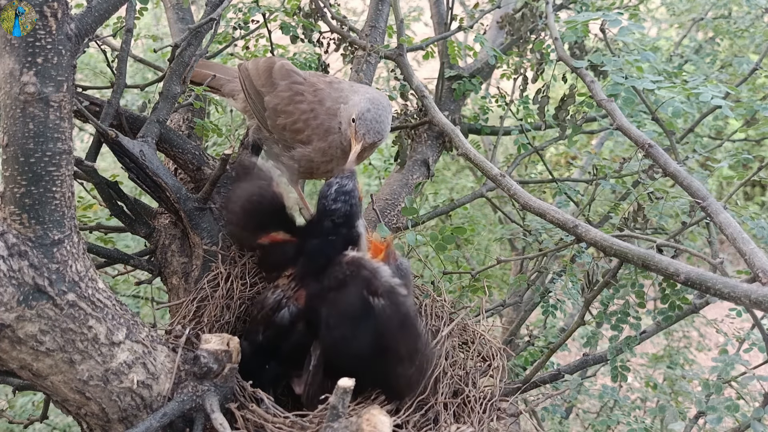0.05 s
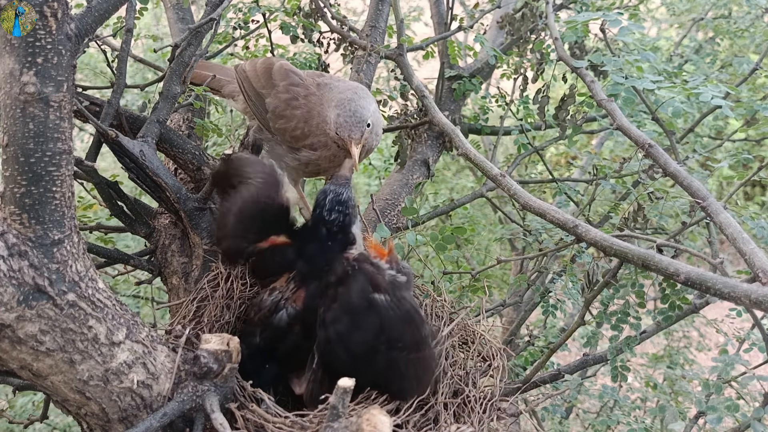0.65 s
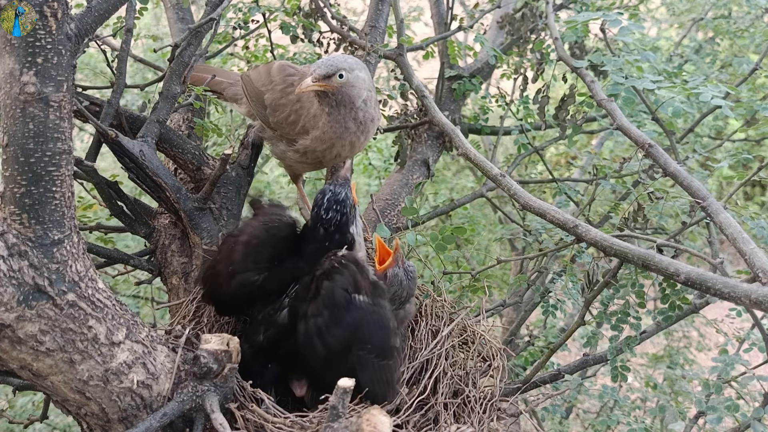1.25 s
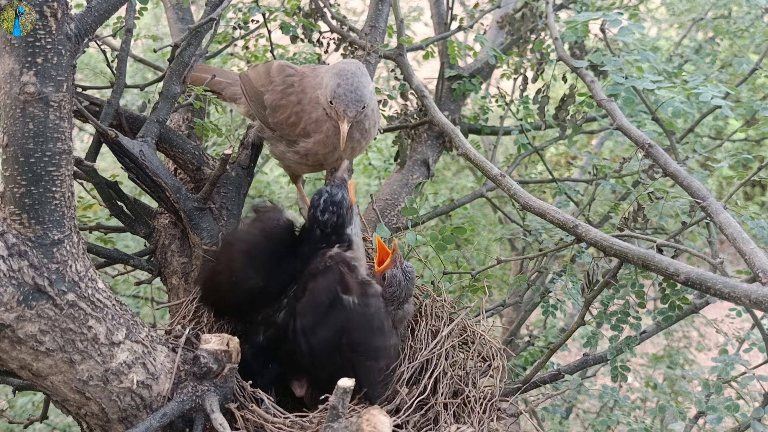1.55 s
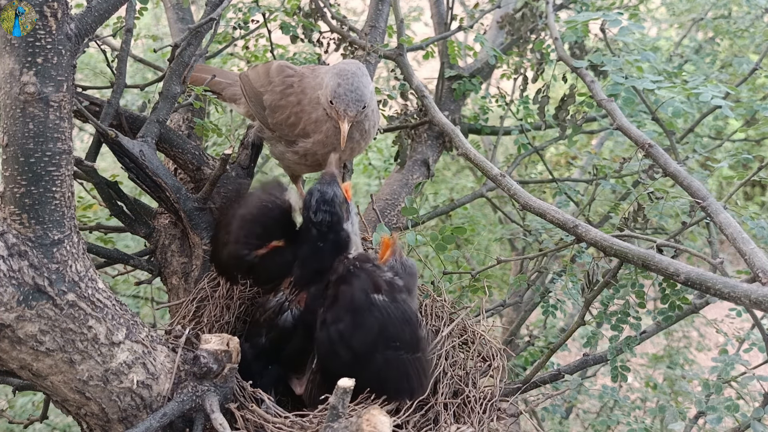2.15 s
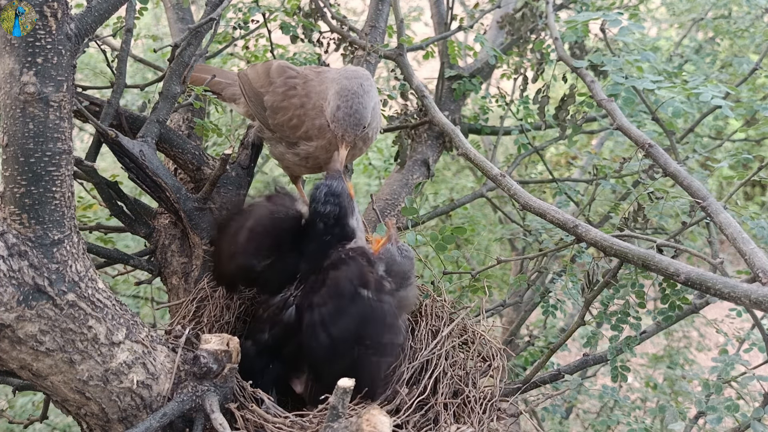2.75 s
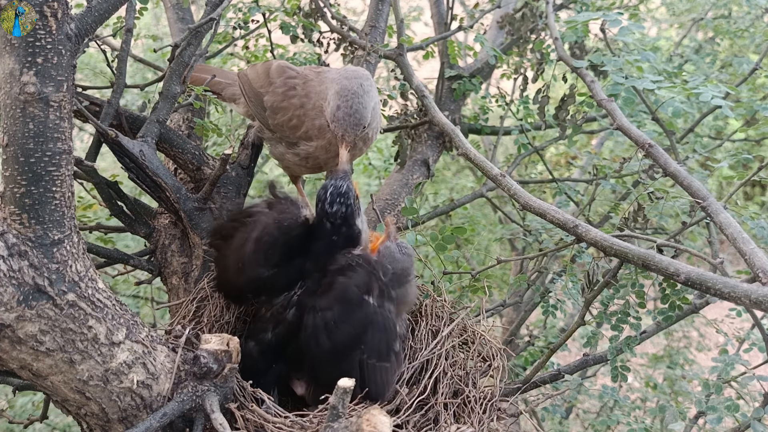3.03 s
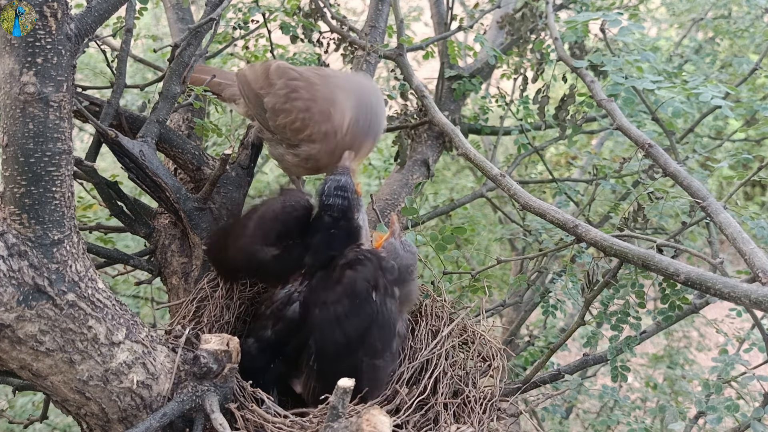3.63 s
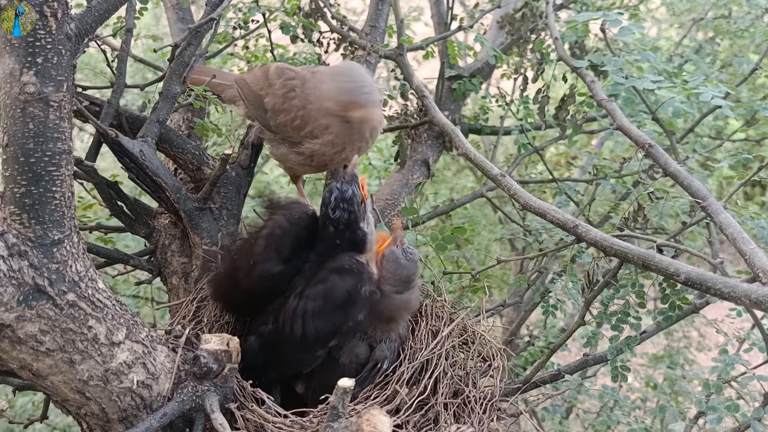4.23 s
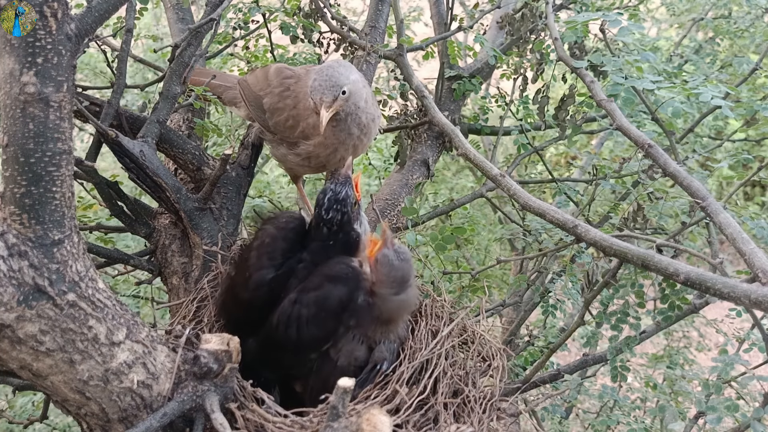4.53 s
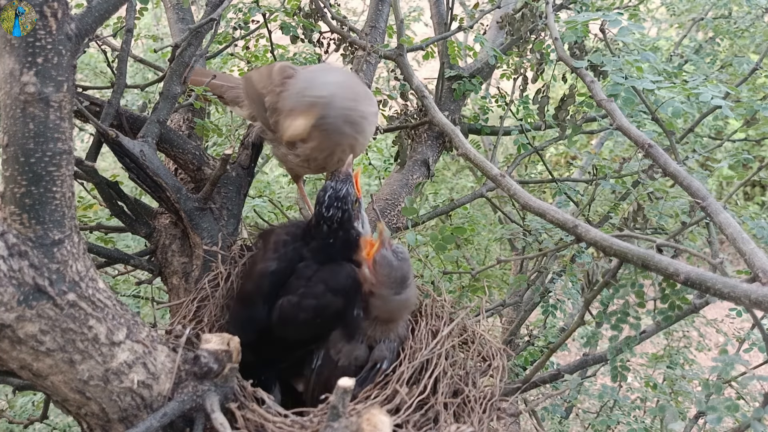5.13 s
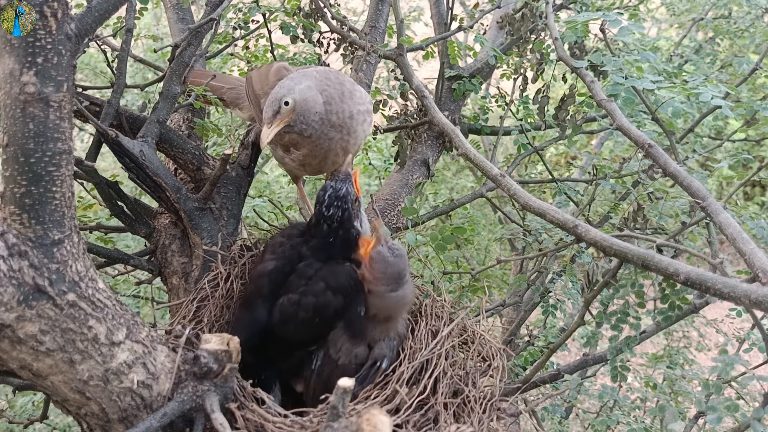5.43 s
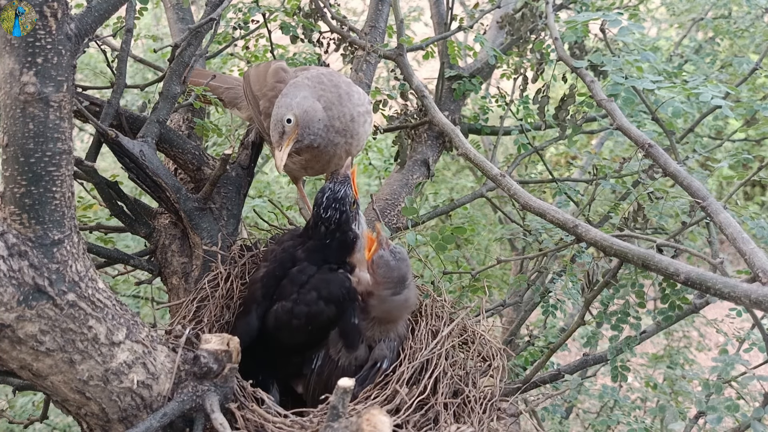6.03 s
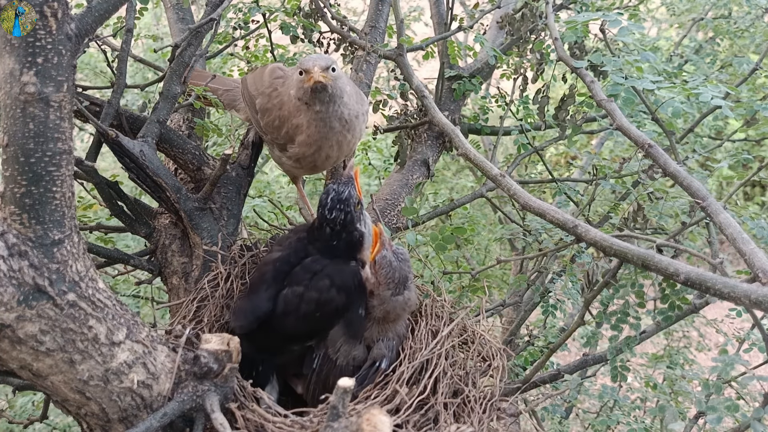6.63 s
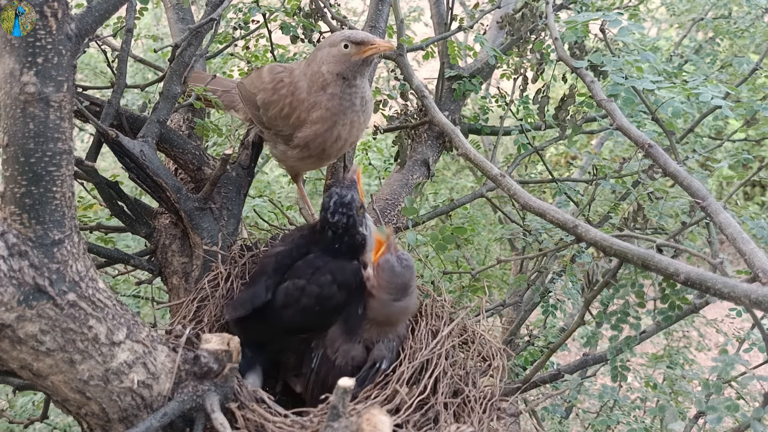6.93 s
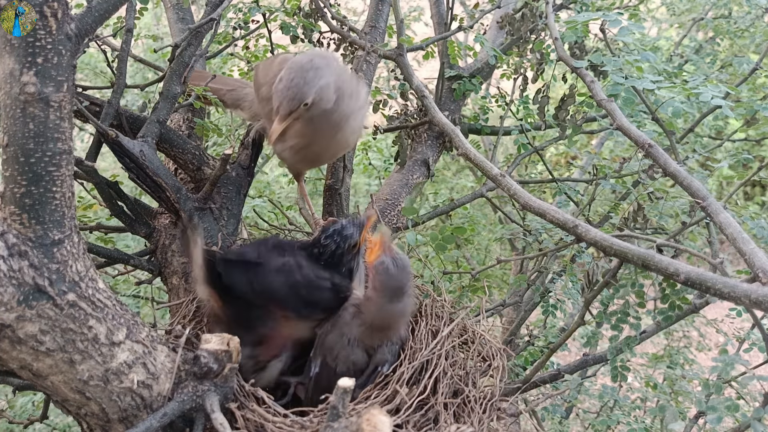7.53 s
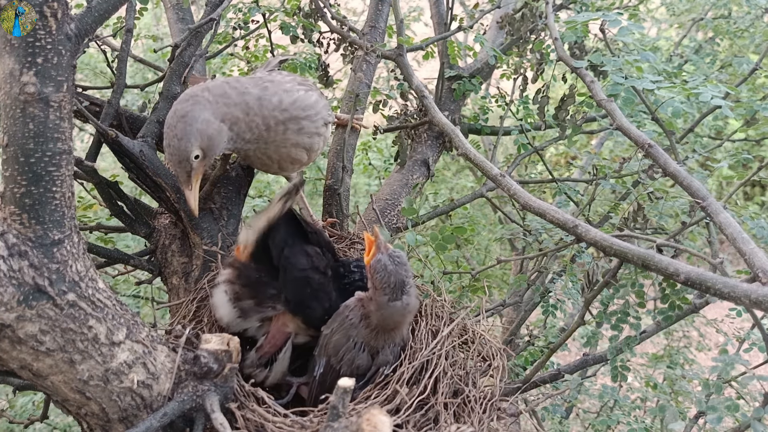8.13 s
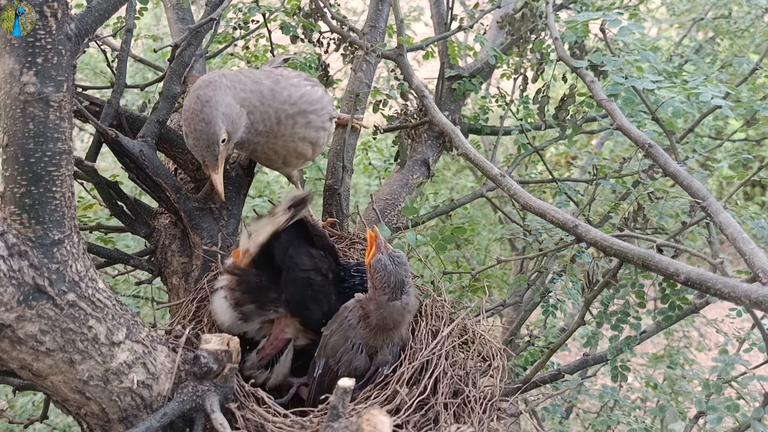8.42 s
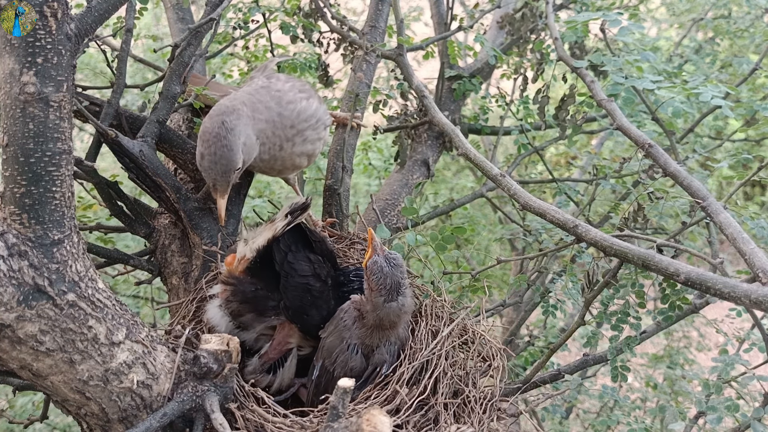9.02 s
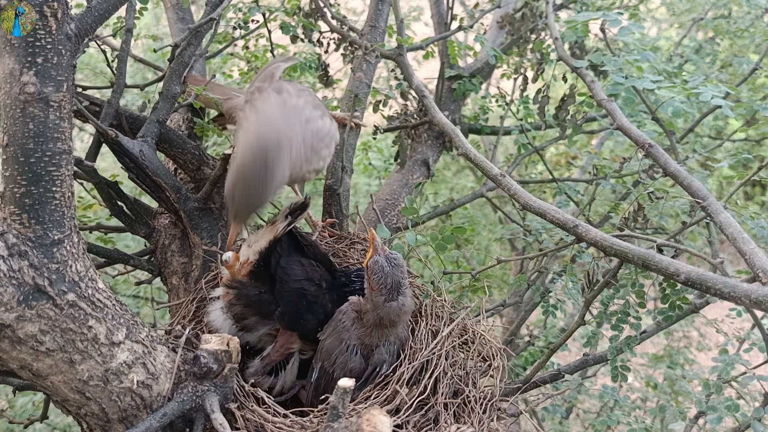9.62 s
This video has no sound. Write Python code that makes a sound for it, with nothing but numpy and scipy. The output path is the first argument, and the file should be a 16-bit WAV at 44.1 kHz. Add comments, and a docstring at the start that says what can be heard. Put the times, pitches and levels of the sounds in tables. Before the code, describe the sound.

Young birds beg in a tree nest, close to the microphone. One repeats shrill peeps that break into a rasp, with short chucks between, while its nest mates overlap with hoarse falling squawks and a few thin squeals. Near the end the squawks stop, leaving sparser peeps and chucks. Behind them are a faint insect hiss, an early small trill, distant whistles and a barely audible engine hum.

```python
"""Nestlings begging in a tree

One microphone close to a twig nest, where a parent stands over its young. One gives shrill arched
peeps that break into a rasp, with short chucks between; the others squeal and squawk in hoarse,
falling glides. Each voice is a membrane buzzing through throat and bill, echoed by the branches.
Further off insects hiss, a small bird trills, others whistle and an engine hums very faintly."""
import sys
import numpy as np
from scipy import signal
from scipy.fft import rfft, irfft
from scipy.io import wavfile

SR = 44100
rng = np.random.default_rng(int(sys.argv[2]) if len(sys.argv) > 2 else 0)


def digitize_waveform(pressure):
    """Quantize a signal to 16-bit integers and store it at the path in sys.argv[1].

    Rows of a 2-D input are taken as channels; values are limited to [-1, 1].
    """
    field = np.atleast_2d(pressure).T
    bounded = np.clip(field, -1, 1)
    quanta = np.round(bounded * 32767).astype(np.int16)
    wavfile.write(sys.argv[1], SR, quanta)


N = 430857
CUTOFF_HZ = 15700


def from_db(db):
    """Decibels to gain."""
    return 10 ** (np.asarray(db) / 20)


def unit_power(x):
    """Scale to unit power."""
    return x / np.sqrt(np.mean(x ** 2) + 1e-20)


def gain_at(spectrum, hz):
    """Gain of a spectrum at the given frequencies."""
    known_hz, db = np.transpose(spectrum)
    return from_db(np.interp(np.log(hz + 1e-3), np.log(known_hz), db))


def coloured(spectrum, size):
    """Noise with the given spectrum, unit power."""
    gains = gain_at(spectrum, np.fft.rfftfreq(size, 1 / SR))
    return unit_power(irfft(rfft(rng.standard_normal(size)) * gains, size))


def flutter(rate_hz, size):
    """Random wavering up to about the given rate, spread 1."""
    pole = np.exp(-2 * np.pi * rate_hz / SR)
    noise = rng.standard_normal(size + SR // 10)
    return unit_power(signal.lfilter([1], [1, -2 * pole, pole * pole], noise))[-size:]


def times(start, end):
    """Sample times of a span."""
    return np.arange(max(0, int(start * SR)), min(N, int(end * SR))) / SR


def fade(t, start, end, rise_s, fall_s):
    """Gate with sloping ends."""
    return np.clip((t - start) / rise_s, 0, 1) * np.clip((end - t) / fall_s, 0, 1)


def add(out, t, sound):
    """Mix a sound in at its times."""
    out[np.round(t * SR).astype(int)] += sound


def slide(age, top_hz, bottom_hz, half_s, power):
    """Pitch as the tension is let go: it lingers, falls, then levels out."""
    return bottom_hz + (top_hz - bottom_hz) / (1 + (np.maximum(age, 0) / half_s) ** power)


def drawn_out(t, pitch, level_db, waver=0.00497, release_s=0.035):
    """Gently wavering pitch and gain of one long call."""
    wavering = pitch * (1 + waver * flutter(31.1, len(t)))
    gain = from_db(level_db + flutter(43, len(t)) / 2)
    return wavering, gain * fade(t, t[0], t[-1], 0.003, release_s)


def gape(throat, treble_db, knee_hz=2400):
    """A wider bill lets out more of the octave above the knee and of all that lies beyond."""
    return [(hz, db + treble_db * np.clip(np.log2(hz / knee_hz), 0, 1)) for hz, db in throat]


def ring_phase(throat, hz, size=2048):
    """Phase of a throat that rings after each beat (minimum phase)."""
    grid = np.fft.rfftfreq(size, 1 / SR)
    cepstrum = irfft(np.log(gain_at(throat, grid)))
    return np.interp(hz, grid, 2 * rfft(cepstrum[:size // 2], size).imag)


def syrinx(pitch, rough, throat, jitter, breath, doubling=0, ripple_db=4.5, shut_db=0, second_db=0,
           count=14):
    """A membrane's harmonics through the throat; roughness shakes its period and lets air hiss."""
    size = len(pitch)
    shake = 0.0029 * flutter(64, size) + jitter * rough * flutter(517, size)
    phase = 2 * np.pi * np.cumsum(pitch * (1 + shake)) / SR
    k = np.arange(1, count + 1)[:, None]
    partial_hz = k * pitch
    # the head bobs among reflecting branches: each partial swells and fades, the high ones most
    bob_db = ripple_db * np.sqrt(partial_hz / 5000) * np.array([flutter(21, size) for _ in k])
    balance = from_db(bob_db - shut_db * np.log2(k) + second_db * (k == 2))
    audible = np.clip((SR / 2 - partial_hz) / (SR / 2 - CUTOFF_HZ), 0, 1) ** 2
    gains = gain_at(throat, partial_hz) * balance * audible
    tone = np.sum(gains * np.sin(k * phase + ring_phase(throat, partial_hz)), axis=0)
    if np.any(doubling):
        # alternate strong and weak beats put lines between the harmonics; the pattern keeps slipping
        between_hz = (k - .5) * pitch
        half_gains = gain_at(throat, between_hz) * (k > 1) * audible
        halves = half_gains * np.sin((k - .5) * phase + ring_phase(throat, between_hz))
        tone += doubling * halves.sum(axis=0) * (1 + .35 * flutter(150, size))
    tone /= np.sqrt(np.sum(gains ** 2, axis=0) * (1 + doubling ** 2) / 2)
    air = breath * rough
    hiss = coloured(throat, size) * (1 + np.cos(phase) / 2)
    # turbulence spares the lowest notes
    hiss = signal.sosfilt(signal.butter(2, 1300, "high", fs=SR, output="sos"), hiss)
    return (tone + air * hiss) / np.sqrt(1 + air ** 2)


# air all round the microphone: f/Hz, relative density/dB
AIR_SPECTRUM = [(30, -16), (70, -1), (200, -9), (1700, -4.5), (4500, -22), (16000, -34)]


def still_air(level_db=-75):
    """A steady, dull bed of noise."""
    return from_db(level_db) * coloured(AIR_SPECTRUM, N)


# insect hiss as recorded, ducked in the pauses by the recorder's noise suppressor: t/s, level/dB
DUCKED_HISS_LEVELS = [(.3, -80), (1.45, -74), (1.65, -66.5), (6.7, -65.5), (6.95, -91), (7.2, -62),
                      (9.1, -73), (9.25, -79.5)]
# band of the insect chorus behind the nest: f/Hz, relative density/dB
INSECT_SPECTRUM = [(5500, -13.5), (6600, 2), (7350, 8), (7900, 7.5), (8600, -14.5), (10000, -41.5)]


def insects():
    """A high insect hiss, turned down at set times where the recorder's noise suppressor ducks it."""
    level_db = np.interp(np.arange(N) / SR, *np.transpose(DUCKED_HISS_LEVELS))
    return from_db(level_db) * coloured(INSECT_SPECTRUM, N)


# engine a long way off: multiple of the firing rate, level/dB
ENGINE_HARMONICS = [(2, -83), (3, -92.5)]


def far_engine(firing_hz=42):
    """Harmonics of a slowly wandering firing rate."""
    phase = 2 * np.pi * np.cumsum(firing_hz * (1 + 0.019 * flutter(1, N))) / SR
    return sum(np.sqrt(2) * from_db(db) * np.sin(k * phase) for k, db in ENGINE_HARMONICS)


# birds far off in the grove: start t/s, end t/s, f/Hz, level/dB
FAR_WHISTLES = [(0, 0.057, 720, -53), (6.63, 6.79, 1153, -62.5), (7.506, 7.726, 1130, -62),
                (8.313, 8.542, 615, -68.5), (8.79, 9.077, 1188, -60.5), (9.671, 9.796, 737, -60.5)]


def far_birds():
    """Distant whistles, blurred by their many paths through the trees."""
    out = np.zeros(N)
    for start, end, pitch_hz, level_db in FAR_WHISTLES:
        t = times(start, end)
        phase = 2 * np.pi * pitch_hz * t
        blurred = flutter(39, len(t)) * np.sin(phase) + flutter(37, len(t)) * np.cos(phase)
        add(out, t, from_db(level_db) * fade(t, start, end, 0.048, 0.049) * blurred)
    return out


def trill(per_s=45.3, first_s=0.0085, top_hz=5130, bottom_hz=4170, level_db=-56, end_s=2.7):
    """Behind the nest a small bird repeats a tiny downward whistle very fast."""
    t = np.arange(N) / SR
    cycle = ((t - first_s) * per_s) % 1
    pitch = (top_hz + (bottom_hz - top_hz) * cycle) * (1 + flutter(20, N) / 100)
    whistle = np.sqrt(2) * np.sin(2 * np.pi * np.cumsum(pitch) / SR)
    pulses = from_db(level_db + 1.5 * flutter(20, N)) * np.sin(np.pi * cycle) ** 3
    return pulses * whistle * fade(t, 0, end_s, 1.0, 0.8)


# thin, scratchy squeals in the nest:
# start t/s, top t/s, end t/s, top f/Hz, bottom f/Hz, half-way time/s, level/dB, treble/dB
SQUEAL_CALLS = [(0.056, 0.057, 0.18, 2754, 502, 0.095, -48.5, 8),
                (0.465, .47, .65, 2295, 1416, 0.092, -53.5, 2),
                (2.307, 2.325, 2.509, 3324, 1365, 0.064, -41, -5),
                (3.529, 3.54, 3.836, 3050, 1536, 0.075, -41.5, -9),
                (4.861, 4.9, 5.085, 2876, 1570, 0.035, -43, -29)]
# throat and bill in a squeal: f/Hz, gain/dB
SQUEAL_RESONANCES = [(1700, 8.5), (2850, -7), (3250, 11.5), (4400, 4), (5700, 5), (7000, -2.5),
                     (10500, -33.5)]


def squeals(onset_db=-9, onset_s=0.03, rise_per_s2=140):
    """A strained voice rises to its top and frays as it sinks."""
    out = np.zeros(N)
    for start, top, end, top_hz, bottom_hz, slide_s, level_db, treble_db in SQUEAL_CALLS:
        t = times(start - .004, end + 0.017)
        rise = 1 - rise_per_s2 * np.maximum(top - t, 0) ** 2
        pitch = rise * slide(t - top, top_hz, bottom_hz, slide_s, power=2.3)
        pitch, gain = drawn_out(t, pitch, level_db + onset_db * np.exp((t[0] - t) / onset_s))
        fray = np.interp(pitch, [1900, 3000], [1, .25])
        throat = gape(SQUEAL_RESONANCES, treble_db, knee_hz=5000)
        add(out, t, gain * syrinx(pitch, fray, throat, jitter=0.056, breath=0.065))
    return out


# the shrill nestling, close to the microphone: start t/s, break t/s, crest f/Hz, sagged f/Hz,
# midway level/dB, swell/dB, treble/dB, second partial/dB
PEEP_CALLS = [(0.117, 0.243, 2306, 2435, -48, -4.5, -7.5, 1), (0.607, 0.73, 2340, 2250, -51.5, 1, 1, 3.5),
              (0.826, 0.875, 2022, 1946, -29.5, -3.5, -1.5, 3),
              (0.975, 1.067, 1944, 1730, -32.5, 0, -3.5, -2), (1.159, 1.295, 1973, 1852, -31, 1, 0, -9),
              (1.954, 2.059, 2236, 1998, -27, -7, 0, 8), (2.47, 2.66, 2245, 1888, -27.5, -1.5, 1.5, -0.5),
              (2.726, 2.822, 2054, 1800, -25.5, -3, 3, -5),
              (2.887, 2.958, 1805, 1590, -28.5, 3.5, 11.5, 4.5), (3.04, 3.155, 1833, 1617, -27, 1, 8, 2.5),
              (3.407, 3.525, 1793, 1612, -28, 1.5, 8, 1), (3.814, 3.93, 2007, 1728, -26.5, -4, 4.5, -6.5),
              (4.259, 4.377, 2095, 1944, -29.5, -1, 2.5, -6), (4.679, 4.795, 2126, 1990, -29.5, 3.5, 4, -8),
              (5.218, 5.334, 2174, 2044, -26.5, -6.5, 0.5, 0.5),
              (5.41, 5.464, 2147, 2003, -26, -5.5, 3, -2), (5.66, 5.769, 2095, 1880, -27, -3, 2.5, -2.5),
              (5.845, 5.963, 1989, 1694, -29, -3.5, 3, -3), (6.027, 6.109, 1910, 1567, -29.5, -1, 7.5, -5),
              (6.353, 6.491, 1847, 1560, -31, 4, 6.5, -1), (6.74, 6.885, 1907, 1667, -44.5, -3, 3.5, 0),
              (7.213, 7.349, 2005, 1780, -26, -5.5, 6, 1.5), (7.635, 7.784, 1989, 1816, -27.5, -5.5, 4, 3),
              (8.23, 8.355, 2009, 1943, -30, -6.5, -1, 2), (8.688, 8.813, 2032, 1915, -29, -7.5, 2.5, 4.5),
              (9.077, 9.177, 1998, 1905, -40, -8, 1.5, 6), (9.424, 9.571, 2002, 1808, -28, -3, 4, 0)]
# moments when a peep's recorded level jumps up as the recorder's noise suppressor opens: t/s
PEEP_LEVEL_JUMPS = [1.974, 3.046, 4.756, 6.368, 8.766, 9.461]
# throat and bill in a peep; partials swell and fade as they slide across its peaks: f/Hz, gain/dB
PEEP_RESONANCES = [(1000, -16.5), (1650, -2), (2000, 6), (2300, -4), (2900, 2), (3450, -8.5), (4150, -6.5),
                   (4450, 6), (5200, -1.5), (5900, 3), (6500, -10), (7400, -17), (9300, -21), (10800, -41),
                   (13000, -28)]


def peeps(crest=0.37, scoop_s=0.0095, bend_s=0.0043, shudder_hz=165, onset_s=0.014, ducked_db=-10):
    """Each peep scoops up to its crest, sags, then bends over and breaks into a rasp."""
    out = np.zeros(N)
    for start, end, crest_hz, sagged_hz, level_db, swell_db, treble_db, second_db in PEEP_CALLS:
        t = times(start - .006, end + 0.0029)
        age, along = np.maximum(t - start, 0), (t - start) / (end - start)
        sag = np.clip((along - crest) / (1 - crest), 0, 1) ** 1.2
        pitch = crest_hz + (sagged_hz - crest_hz) * sag
        pitch *= 1 - 0.22 * np.exp(-age / scoop_s)
        pitch *= 1 - 0.055 * np.exp((t - end) / bend_s)
        pitch *= 1 + 0.0055 * flutter(23, len(t))
        # a fast shudder of pitch and strength grows toward the break
        shudder_rate = shudder_hz * (1 + .15 * flutter(20, len(t)))
        shudder = (.3 + along) * np.sin(2 * np.pi * np.cumsum(shudder_rate) / SR)
        pitch *= 1 + .006 * shudder
        onset = np.exp(-age / onset_s)
        rough = 0.0038 + 1.02 * onset   # the tone takes a moment to lock in
        fray = np.clip((1900 - pitch) / 300, 0, 1)   # and frays when it sinks low
        ducked = sum(np.clip((at - t) / 0.0036, 0, 1) for at in PEEP_LEVEL_JUMPS if start < at < end)
        arch_db = -2 * (2 * along - 1) ** 2
        envelope_db = level_db + swell_db * (along - .5) + arch_db - 15 * onset + ducked_db * ducked
        shut_db = 6.5 * np.exp(-age / 0.022)   # overtones lose this per octave while the bill opens
        voice = syrinx(pitch, rough + 0.25 * fray, gape(PEEP_RESONANCES, treble_db), jitter=0.038,
                       breath=0.68, ripple_db=2.5, shut_db=shut_db, second_db=second_db, count=10)
        gain = from_db(envelope_db + 1.1 * shudder + fray * flutter(78, len(t)))
        add(out, t, gain * fade(t, t[0], t[-1], 0.0067, 0.0043) * voice)
        add(out, *rasp(end, .88 * sagged_hz, envelope_db[-1], treble_db))
    return out


# throat and open bill in a rasp or chuck: f/Hz, gain/dB
RASP_RESONANCES = [(750, -56), (1200, -2), (2000, 13), (3000, -1.5), (4500, 10.5), (5900, 5), (7000, -6.5),
                   (9000, -14.5), (10800, -36), (13000, -16), (15500, -26.5)]


def rasp(start, first_hz, level_db, treble_db, length_s=0.034, collapse_s=0.015, slack_hz=680):
    """The membrane goes slack and the pitch tumbles; returns times and sound."""
    t = times(start - .002, start + length_s)
    age = np.maximum(t - start, 0)
    along = age / length_s
    pitch = slack_hz + (first_hz - slack_hz) * np.exp(-age / collapse_s)
    throat = gape(RASP_RESONANCES, min(treble_db, 0) + 0.5)
    voice = syrinx(pitch, 0.085 + along, throat, jitter=0.056, breath=1.0)
    return t, from_db(level_db - 20 * along ** 3.3) * fade(t, t[0], t[-1], 0.0013, 0.0034) * voice


# its hoarse nest mates: start t/s, swing t/s, end t/s, first f/Hz, moan f/Hz, crest f/Hz,
# slide half-way time/s, moan level/dB, slide level/dB, treble/dB, strain around 1
SQUAWK_CALLS = [(0.185, 0.417, .62, 1950, 895, 2100, 0.044, -60, -55, -2, 1.05),
                (0.746, 0.863, .93, 1250, 987, 908, 0.022, -36.5, -34.5, 2, 0.75),
                (0.928, 1.088, 1.11, 2007, 1583, 1297, 0.018, -38.5, -37, -4, 2.5),
                (1.861, 2.021, 2.13, 1189, 1022, 2190, 0.037, -40.5, -34.5, -2, 1.04),
                (2.239, 2.283, 2.42, 1323, 854, 768, 0.041, -37, -37, 1, 0.92),
                (2.621, 2.837, 3.035, 1507, 957, 2292, 0.08, -38.5, -35.5, 2.5, 0.74),
                (3.235, 3.331, 3.42, 1399, 1061, 857, 0.025, -35.5, -34, 4, 0.76),
                (3.82, 4.039, 4.28, 1987, 953, 2196, 0.065, -38.5, -34.5, 2, 0.81),
                (4.472, 4.639, 4.85, 1368, 893, 2215, 0.076, -39, -39.5, -1, 0.83),
                (5.019, 5.109, 5.2, 1451, 1091, 978, 0.023, -34.5, -34.5, 4, .9),
                (5.615, 5.808, 6.105, 1753, 919, 2117, .064, -37, -33.5, 4, 0.67),
                (6.368, 6.584, 6.62, 1778, 1375, 1286, 0.021, -40.5, -39.5, -9, 1.16),
                (7.048, 7.128, 7.225, 1237, 1190, 1120, 0.038, -42.5, -31.5, 4, 1.14),
                (7.348, 7.429, 7.515, 1900, 1398, 1383, 0.082, -36.5, -44.5, -12.5, 0.68),
                (7.77, 7.842, 8.082, 1739, 789, 1328, 0.042, -35.5, -34.5, 0, 0.95)]
# throat and open bill in a squawk: f/Hz, gain/dB
SQUAWK_RESONANCES = [(550, -31.5), (750, -10.5), (1000, 0.5), (2100, 3.5), (2700, 1), (3600, -6.5),
                     (4600, 3), (5500, -4.5), (6300, -17.5), (8500, -33.5), (10500, -52.5), (13000, -51)]


def squawks(clear_hz=1900, hoarse_hz=900, doubling_hz=790, buzz_hz=680.5, swing_s=.026,
            settle_hz_per_s2=125000, sag_hz_per_s=530):
    """A voice drops to a moan, swings and slides, hoarser as it sinks, until its period doubles."""
    out = np.zeros(N)
    for (start, swing, end, first_hz, moan_hz, crest_hz, slide_s,
         moan_db, slide_db, treble_db, strain) in SQUAWK_CALLS:
        t = times(start - .004, end + 0.019)
        moan = moan_hz + sag_hz_per_s * (swing - t)
        settle_s = np.sqrt(max(first_hz - moan[0], 0) / settle_hz_per_s2)
        moan += settle_hz_per_s2 * np.maximum(start + settle_s - t, 0) ** 2   # the drop brakes evenly
        swung = np.sin(np.pi / 2 * np.clip((t - swing) / swing_s, 0, 1)) ** 2
        glide = slide(t - swing - swing_s, crest_hz, buzz_hz, slide_s, power=3.2)
        pitch = moan + swung * (glide - moan)
        slack = np.clip((clear_hz - pitch) / (clear_hz - hoarse_hz), 0, 1)
        onset_db = -11.5 * np.exp((t[0] - t) / 0.013)
        level_db = moan_db + swung * (slide_db - moan_db) + onset_db - 1.5 * (1 - slack)
        pitch, gain = drawn_out(t, pitch, level_db)
        doubling = 0.06 * slack + 0.51 * np.clip((doubling_hz - pitch) / 70, 0, 1)
        rough = strain * (.2 + .8 * slack) + doubling
        pressed_db = 1.5 * (strain - 1)   # a strained voice is richer in overtones
        voice = syrinx(pitch, rough, gape(SQUAWK_RESONANCES, treble_db), jitter=.019, breath=.33,
                       doubling=doubling, ripple_db=3.6, shut_db=-pressed_db, count=21)
        add(out, t, gain * voice)
    return out


# chucks from the shrill nestling:
# start t/s, end t/s, crest f/Hz, level before trim/dB, roughness, place of the crest 0-1
CHUCK_CALLS = [(0.728, 0.76, 2077, -26, 0.3, 0.15), (1.378, 1.42, 1472, -35.5, 1.33, 0.31),
               (1.976, 2.041, 2077, -28.5, 0.78, 0.21), (2.148, 2.189, 1520, -35, 1.07, 0.33),
               (3.263, 3.333, 1597, -28, 0.53, 0.14), (3.611, 3.691, 1524, -30, 0.95, 0.36),
               (4.01, 4.069, 1497, -31.5, 0.85, 0.2), (4.459, 4.491, 1526, -36.5, 1.5, 0.4),
               (5.553, 5.627, 1422, -31.5, 0.94, 0.4), (6.21, 6.287, 1578, -32.5, 0.66, 0.3),
               (6.577, 6.613, 1450, -33.5, 1, 0.29), (6.976, 7.023, 1513, -51, 1.6, .35),
               (7.438, 7.47, 1504, -37.5, 1.16, 0.23), (8.432, 8.467, 1686, -47, 1.57, .3),
               (8.9, 8.939, 1535, -39.5, 1.13, 0.32), (9.28, 9.314, 1602, -48, 1.8, 0.1),
               (9.64, 9.711, 1827, -27.5, 0.4, 0.1)]


def chucks(drop=0.57, trim_db=-5):
    """Short notes that start as a harsh crackle, arch briefly and clear as they drop."""
    out = np.zeros(N)
    throat = gape(RASP_RESONANCES, -2.2)
    for start, end, crest_hz, level_db, rough, crest in CHUCK_CALLS:
        t = times(start, end + 0.0078)
        along = np.linspace(0, 1, len(t))
        pitch = crest_hz * (1 - drop * np.abs((along - crest) / (1 - crest)) ** 1.6)
        voice = syrinx(pitch, rough * (1.5 - along), throat, jitter=0.0358, breath=1.0)
        add(out, t, from_db(level_db + trim_db) * fade(t, t[0], t[-1], 0.007, 0.013) * voice)
    return out


# what the grove sends back to the microphone: f/Hz, gain/dB
GROVE_SPECTRUM = [(1200, 15.5), (2000, 6), (3000, -5), (6500, -16.5), (12000, -46)]


def tree_echoes(x, near_db=-14.5, near_t60=0.2, far_db=-25.5, far_t60=1.0, echoes_per_s=500):
    """Near branches scatter quick echoes; the grove adds a faint, duller tail."""
    t = times(0, 0.61)
    scatter = rng.standard_normal(len(t)) * (rng.random(len(t)) < echoes_per_s / SR)
    near = scatter * from_db(-60 * t / near_t60) * (t > .003)
    far = coloured(GROVE_SPECTRUM, len(t)) * from_db(-60 * t / far_t60) * (t > .02)
    echo = from_db(near_db) * near / np.linalg.norm(near) + from_db(far_db) * far / np.linalg.norm(far)
    return signal.fftconvolve(x, echo)[:N]


def scene(lowest_hz=630):
    """Mono, from beside the nest: birds too small to radiate bass, with the grove behind them."""
    birds = peeps() + chucks() + squawks() + squeals() + trill()
    birds = signal.sosfilt(signal.butter(6, lowest_hz, "high", fs=SR, output="sos"), birds)
    return (birds + tree_echoes(birds) + far_birds() + insects() + far_engine() + still_air())[None]


def record(dry):
    """The microphone signal, with its top cut steeply."""
    return signal.sosfilt(signal.ellip(12, .1, 80, CUTOFF_HZ, fs=SR, output="sos"), dry)


dry = scene()
out = record(dry)
digitize_waveform(out)
```